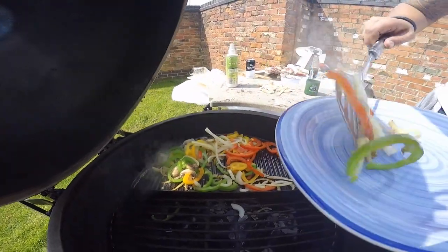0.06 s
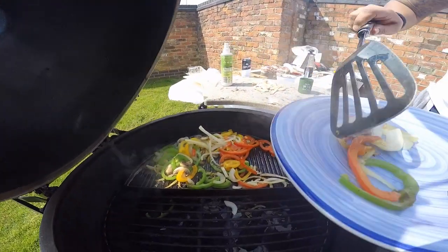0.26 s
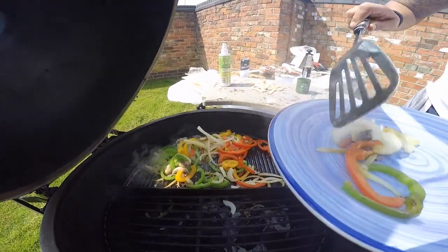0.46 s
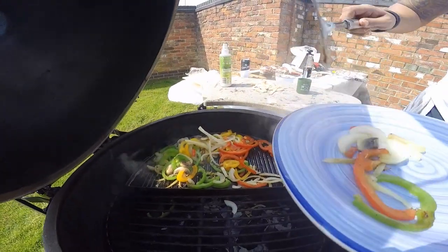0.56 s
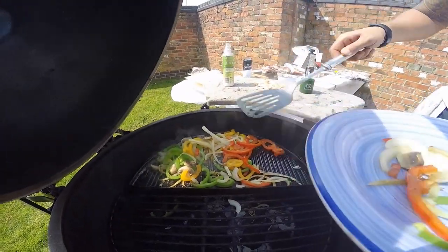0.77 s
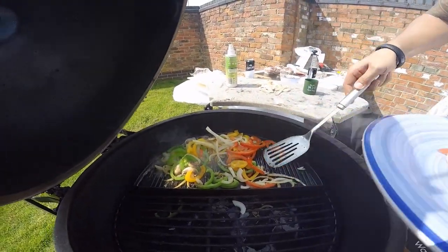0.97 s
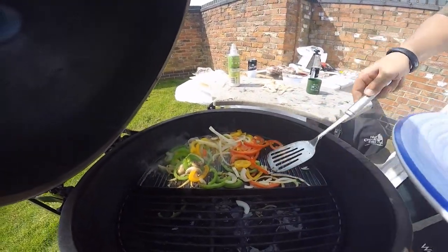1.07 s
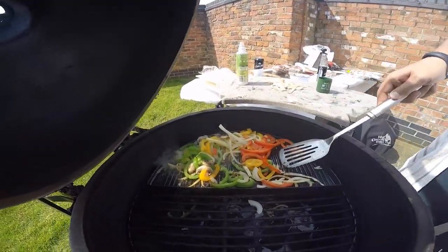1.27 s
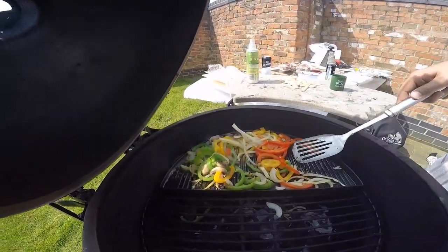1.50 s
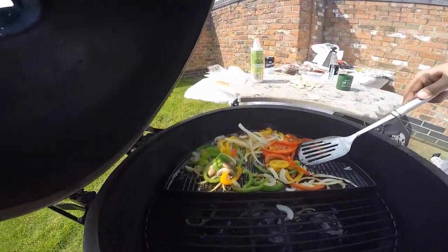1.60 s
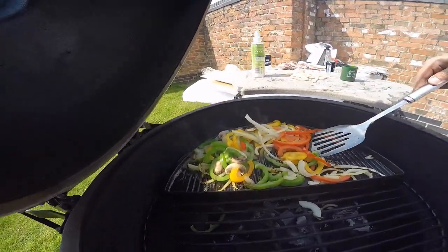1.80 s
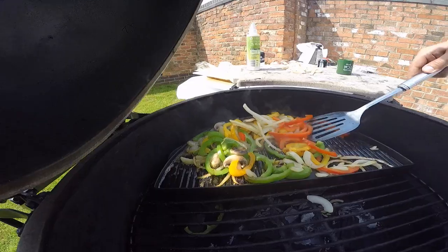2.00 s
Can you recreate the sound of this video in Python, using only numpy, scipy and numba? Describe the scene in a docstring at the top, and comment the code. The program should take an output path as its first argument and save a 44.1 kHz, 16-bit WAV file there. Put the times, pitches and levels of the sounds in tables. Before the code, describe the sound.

A steel spatula knocks sharply on a ceramic plate at about 0.15 and 0.5 seconds, close by, the blade ringing briefly, with soft pats of vegetables landing between the knocks. At 1.1 seconds it scuffs and clanks onto a grill grate, clanks again at 1.4, and twice quickly around 1.7. Faint sizzling with small crackles and a low outdoor rumble run throughout.

```python
"""A slotted steel spatula knocks twice on a ceramic plate to shed vegetables, ringing both plate and blade.
Back at the charcoal grill it scuffs along the grate and clanks on the bars, with a faint echo off the
yard's walls. Vegetables pat down softly and sizzle with steam and droplets over a low outdoor rumble.
The close microphone overloads on the knocks, and its gain control ducks the background after them."""
import sys
import numpy as np
from scipy import signal
from scipy.fft import rfft, irfft
from scipy.io import wavfile
from numba import njit

SR = 44100
rng = np.random.default_rng(int(sys.argv[2]) if len(sys.argv) > 2 else 0)


def dump(signal):
    """Clip the signal to [-1, 1] and save it as 16-bit WAV at the path in sys.argv[1]."""
    limited = np.clip(np.atleast_2d(signal).T, -1, 1)
    pcm = np.round(limited * 32767).astype(np.int16)
    wavfile.write(sys.argv[1], SR, pcm)


N = 90404

# pitches of the grate's modes: f/Hz
GRATE_HZ = [528, 547, 573, 653, 735, 1001, 1227, 1308, 1665, 1904, 2022, 2155, 2435, 2790, 3113, 3213, 3545,
            3716, 3890, 4420, 4612, 5060, 5445]
# decay and strength of those modes: t60/s, level/dB when struck at spot 0, 1, 2, 3
GRATE_MODES = [(0.18, -30, -20.5, -49, -29), (0.3, -40, -34, -39, -35), (0.58, -42.5, -35, -40.5, -40),
               (0.078, -20.5, -21, -14, -25), (0.06, -19, -42, -14.5, -24), (0.093, -20, -22, -48, -27),
               (0.12, -24.5, -45, -20.5, -30.5), (0.45, -33.5, -51, -54, -47), (0.18, -27, -29, -18, -51),
               (0.13, -29, -44, -34, -26), (0.098, -34, -38, -10, -52), (.09, -20, -38, -30, -33),
               (0.11, -19.5, -17.5, -10.5, -30.5), (0.038, -36, -39, -14, -53), (0.11, -19, -41, -23, -27),
               (0.16, -21.5, -25, -33, -35), (0.16, -23, -45, -22, -55), (0.061, -8, -30, -11, -52),
               (0.076, -19, -20.5, -9, -35), (0.13, -28, -43, -36, -46), (0.044, -48, -48, -9.5, -55),
               (.09, -53, -36, -23, -32.5), (0.066, -47, -20.5, -27, -41)]


def undb(db):
    """Decibels to gain."""
    return 10 ** (np.asarray(db) / 20)


def clock():
    """Time of every sample in seconds."""
    return np.arange(N) / SR


def curve(rows):
    """Gain riding along breakpoints of t/s, level/dB."""
    return undb(np.interp(clock(), *np.array(rows).T))


def colour(x, eq):
    """Shape x with an EQ curve of f/Hz, level/dB, then normalise to rms 1."""
    hz, db = np.array(eq).T
    bin_hz = np.maximum(np.arange(N // 2 + 1) * SR / N, 1)
    shaped = irfft(rfft(x) * undb(np.interp(np.log(bin_hz), np.log(hz), db)), N)
    return shaped / np.std(shaped)


def noise(eq):
    """Noise coloured by an EQ curve, at rms 1."""
    return colour(rng.standard_normal(N), eq)


def grains(per_s, spread_db):
    """Random tiny clicks, their levels scattered from 0 dB to three times spread_db."""
    size = undb(spread_db * np.minimum(rng.exponential(size=N), 3))
    return (rng.random(N) < per_s / SR) * size * rng.choice([-1, 1], N)


def fade(start, rise, t60):
    """Envelope with a straight attack and an exponential decay; times in seconds."""
    age = clock() - start
    attack = np.clip(age / max(rise, 1 / SR), 0, 1)
    return attack * np.exp(-np.log(1000) * np.maximum(age - rise, 0) / t60)


def ring(start, rise, pitches, modes, spot):
    """Decaying modes set off by one blow; the striking spot sets their balance."""
    age = clock() - start
    return sum(undb(levels[spot]) * fade(start, rise, t60) * np.sin(2 * np.pi * (hz * age + rng.random()))
               for hz, (t60, *levels) in zip(pitches, modes))


def rumble():
    """A low outdoor bed that gently swells and sinks."""
    eq = [(15, -3.5), (30, -0.5), (55, -5), (68, 3.5), (80, 9), (95, -6), (130, -4.5), (180, -14.5),
          (260, -16), (400, -39.5), (800, -35), (3000, -66)]  # rumble colour: f/Hz, level/dB
    swell = [(0, -35.5), (.35, -37), (.7, -38.5), (1.05, -37), (1.32, -35), (1.6, -37.5), (2.05, -33.5)]  # rumble fader: t/s, level/dB
    return curve(swell) * noise(eq)


def flicker(x, per_s, depth_db):
    """Each band of x wavers on its own, as droplets of different sizes boil off."""
    crossovers = [2470, 5160, 8300, 12400]  # edges between the bands: f/Hz
    band = np.searchsorted(crossovers, np.arange(N // 2 + 1) * SR / N)
    out, spectrum = 0, rfft(x)
    for k in range(len(crossovers) + 1):
        wander = np.interp(clock() * per_s, np.arange(1000), rng.standard_normal(1000))
        out += irfft(spectrum * (band == k), N) * undb(depth_db * wander)
    return out


def sizzle():
    """Steam hisses from the vegetables while droplets burst."""
    eq = [(200, -7), (400, -8), (700, -8.5), (1200, -11), (2000, -10), (3000, -4.5), (4200, -5), (5400, -4),
          (7000, -9.5), (10000, -11), (13000, -12), (15500, -16)]  # colour of steam and droplets: f/Hz, level/dB
    swell = [(0, -45.5), (.25, -45), (.45, -43.5), (.65, -45.5), (1.0, -42.5), (1.25, -44.5), (1.6, -41.5),
             (2.05, -39.5)]  # sizzle fader: t/s, level/dB
    droplets = undb(-6) * colour(grains(per_s=1500, spread_db=8.5), eq)
    return curve(swell) * flicker(noise(eq) + droplets, per_s=80, depth_db=1.8)


def spurts():
    """Juice hits the hot bars in short, bright crackles."""
    bursts = [(.015, 0.0074, 0.33, -43), (.44, 0.011, 0.11, -45), (0.678, 0.0022, 0.13, -38),
              (.872, 0.0012, 0.033, -44), (1.562, .002, 0.038, -40), (1.847, .002, 0.058, -42),
              (2.02, 0.0061, .12, -45)]  # spurts of juice: t/s, rise/s, t60/s, level/dB
    eq = [(400, -45), (2000, -22.5), (4500, 1), (7000, -3.5), (12000, 2), (15500, -13.5)]  # crackle colour: f/Hz, level/dB
    crackle = colour(grains(per_s=3400, spread_db=3), eq)
    return crackle * sum(undb(db) * fade(start, rise, t60) for start, rise, t60, db in bursts)


def plate():
    """Each knock cracks, rings the damped plate and the free blade, and thuds in the holding hand."""
    knocks = [(0.1514, 2.5, 0, -7.5, -27), (0.4885, 2, 1, -3, -14.5)]  # blows on the plate: t/s, ring/dB, spot, crack/dB, thud/dB
    plate_hz = [680, 1066, 1760, 1850, 2621, 2755, 2850, 3400, 4330, 4515, 4755, 5970, 6530, 11060]  # ceramic pitches: f/Hz
    plate_modes = [(0.013, -22.5, -4.5), (0.076, -4.5, -15), (0.059, 1.5, -1.5), (0.084, -8.5, -28),
                   (0.054, -15.5, -2), (0.035, -33, -0.5), (0.053, -29, -5.5), (0.098, -5.5, -14),
                   (0.037, -19, -3), (0.04, -4.5, -1.5), (0.034, -5.5, -15), (0.022, -32, -7.5),
                   (0.13, -23.5, -46), (0.071, -20.5, -20.5)]  # ceramic modes: t60/s, level/dB when struck at spot 0, 1
    blade_hz = [1064, 1324, 1762, 2051, 3598, 4595, 5245, 5649, 5780, 8040, 10010]  # steel blade pitches: f/Hz
    blade_modes = [(0.17, -46, -21.5), (0.26, -37, -33), (0.28, -37, -32), (0.41, -46, -35.5),
                   (1.6, -66, -43.5), (0.24, -38.5, -20), (0.19, -28.5, -38), (0.37, -50, -24),
                   (0.15, -28, -17), (0.15, -47, -36), (.15, -46, -24)]  # blade modes: t60/s, level/dB when struck at spot 0, 1
    blade_swell = [(.6, -2), (.67, -3), (.725, 11), (.77, 3), (.9, 4)]  # swell in the blade's ringing: t/s, level/dB
    crack_eq = [(100, -19), (350, -9), (700, -6.5), (1100, 4.5), (1450, -21), (2000, -1.5), (2400, -8),
                (3000, -8), (4600, -0.5), (5300, -8), (7000, -9.5), (11000, -17), (16000, -15)]  # colour of the contact crack: f/Hz, level/dB
    thud_eq = [(50, -17), (110, -14), (170, 4), (300, -7), (450, -8), (700, -14.5), (1500, -44.5)]  # colour of the thud: f/Hz, level/dB
    out = 0
    for start, ring_db, spot, crack_db, thud_db in knocks:
        ceramic = ring(start, 0.0004, plate_hz, plate_modes, spot)
        blade = curve(blade_swell) * ring(start, 0.0014, blade_hz, blade_modes, spot)
        crack = fade(start, rise=0.00035, t60=0.052) * noise(crack_eq)
        thud = fade(start, rise=0.0021, t60=0.048) * noise(thud_eq)
        out += undb(ring_db) * (ceramic + blade) + undb(crack_db) * crack + undb(thud_db) * thud
    return out


def pats():
    """Vegetables land or shift with soft, dull pats."""
    landings = [(0.276, -35), (0.341, -39.5), (1.196, -41), (1.306, -42.5)]  # vegetable contacts: t/s, level/dB
    eq = [(150, -29), (500, 5), (1500, -4), (3000, -5), (8000, -36), (16000, -35)]  # pat colour: f/Hz, level/dB
    return sum(undb(db) * fade(start, rise=0.0017, t60=0.03) * noise(eq) for start, db in landings)


def scuff():
    """The blade sticks and slips as it slides onto the bars; the slips rasp and keep the bars ringing."""
    strokes = [(1.089, .011, 0.13, -22.5)]  # slide of the blade: t/s, rise/s, t60/s, level/dB
    rasp_eq = [(150, 9), (400, -9), (600, 13), (1300, -2), (2000, 3.5), (3500, -5), (5500, -5), (8000, -14),
               (11500, -6.5), (16000, -19)]  # rasp colour: f/Hz, level/dB
    slips = grains(per_s=1400, spread_db=2.5)
    bars = signal.fftconvolve(slips, ring(0, 0, GRATE_HZ, GRATE_MODES, spot=0))[:N]
    scrape = colour(slips, rasp_eq) + undb(-4) * bars / np.std(bars)
    return scrape * sum(undb(db) * fade(start, rise, t60) for start, rise, t60, db in strokes)


def partials(eq, count):
    """A metallic cluster of steady partials at random pitches from 250 to 6000 Hz."""
    pitches = 250 * 24 ** np.sqrt((np.arange(count) + rng.random(count)) / count)
    return colour(sum(np.sin(2 * np.pi * (hz * clock() + rng.random())) for hz in pitches), eq)


def grate():
    """Each blow rings the bars and crushes grit, with a short clatter, a shimmer and the bowl's low ring."""
    clanks = [(1.103, 2, 3, -29, 0.00044, -37.5), (1.397, 4.5, 0, -9.5, 0.00096, -27),
              (1.697, -1, 1, -17, 0.0045, -28), (1.7371, -0.5, 2, -6.5, 0.0028, -29)]  # blows on the grate: t/s, ring/dB, spot, clatter/dB, clatter rise/s, tail/dB
    clatter_eq = [(100, -48), (280, -4.5), (410, -65), (580, -0.5), (900, -14), (1300, 1.5), (1700, -18),
                  (2500, -0.5), (4000, -7), (5500, -15.5), (7000, -22.5), (10000, -33.5), (16000, -33)]  # dense clatter of the bars: f/Hz, level/dB
    grit_eq = [(1000, -32), (4000, -10), (7000, 3), (11500, -5), (15500, -3)]  # burnt crust crushed under the blade: f/Hz, level/dB
    shimmer_eq = [(100, 3), (270, 9), (410, -18.5), (560, 5.5), (850, -7), (1300, 3), (2000, -2),
                  (3400, -4), (5000, -9), (8000, -21), (16000, -32)]  # lingering shimmer of grate and bowl: f/Hz, level/dB
    bowl_eq = [(400, -51), (510, -6), (550, 5.5), (585, 2), (640, -20), (800, -27)]  # close, beating modes of the grill's bowl: f/Hz, level/dB
    out, cluster = 0, partials(shimmer_eq, count=64)
    for start, ring_db, spot, clatter_db, clatter_rise, tail_db in clanks:
        bars = undb(ring_db) * ring(start, 0.0015, GRATE_HZ, GRATE_MODES, spot)
        clatter = undb(clatter_db) * fade(start, clatter_rise, t60=0.074) * noise(clatter_eq)
        crunch = colour(grains(per_s=1600, spread_db=-1), grit_eq)
        grit = undb(-34) * fade(start, rise=0.002, t60=0.11) * crunch
        wash = undb(-4.5) * noise(shimmer_eq)
        shimmer = fade(start, rise=0.0073, t60=0.4) * (cluster + wash)
        bowl = undb(-11.5) * fade(start, rise=0.012, t60=1) * noise(bowl_eq)
        out += bars + clatter + grit + undb(tail_db) * (shimmer + bowl)
    return out


def yard(x):
    """Add the faint echo of the brick walls."""
    wall_eq = [(200, -14), (1000, 0), (2200, 0), (4000, -8), (8000, 4), (16000, -16)]  # echo colour: f/Hz, level/dB
    echo = noise(wall_eq) * fade(start=0.014, rise=0.011, t60=0.62)
    return x + undb(-33.5) * signal.fftconvolve(x, echo / np.linalg.norm(echo))[:N]


def scene():
    """The spatula echoing in a walled yard, over dry cooking sounds and rumble, in mono."""
    spatula = yard(plate() + grate() + scuff())
    vegetables = pats() + spurts() + sizzle()
    return (spatula + vegetables + rumble())[None]


@njit
def follow(x, attack_s, release_s):
    """Envelope follower with separate attack and release times."""
    out, level = np.empty(len(x)), 0.
    for i in range(len(x)):
        rectified = abs(x[i])
        lag_s = attack_s if rectified > level else release_s
        level += (rectified - level) / (lag_s * SR)
        out[i] = level
    return out


def record(dry):
    """Gain control ducks after loud hits, peaks clip softly at full scale, and the top is cut steeply."""
    threshold_db, ratio, top_hz = -24, 1.446, 15500
    level = follow(dry[0], attack_s=0.011, release_s=0.51)
    ducked = dry * np.maximum(level / undb(threshold_db), 1) ** (1 / ratio - 1)
    clipped = ducked / (1 + ducked ** 4) ** .25
    return signal.sosfilt(signal.ellip(8, .2, 70, top_hz, fs=SR, output="sos"), clipped)


dry = scene()
out = record(dry)
dump(out)
```